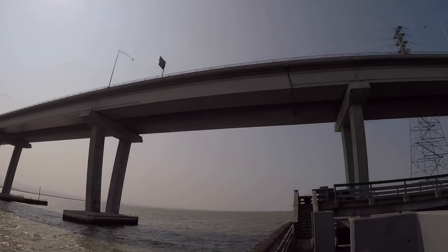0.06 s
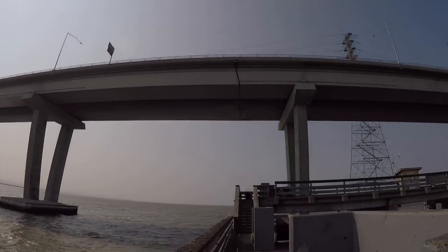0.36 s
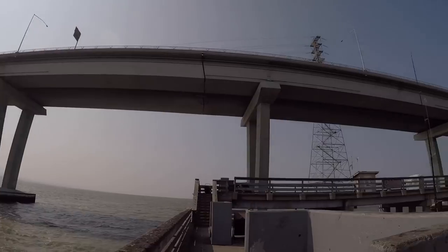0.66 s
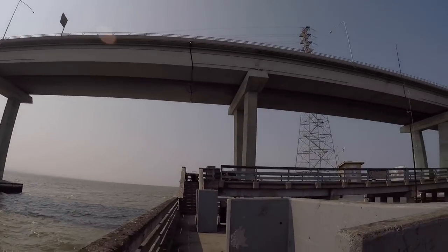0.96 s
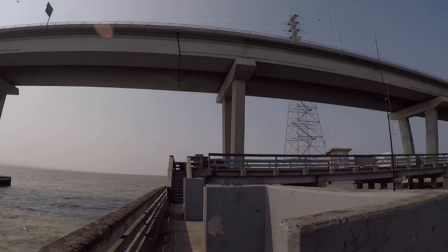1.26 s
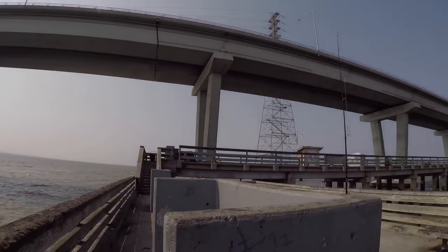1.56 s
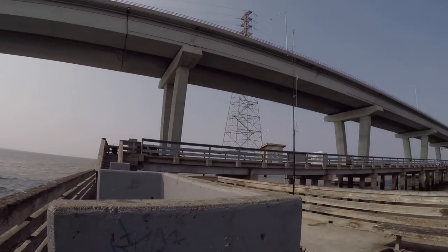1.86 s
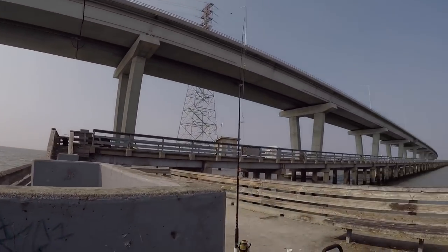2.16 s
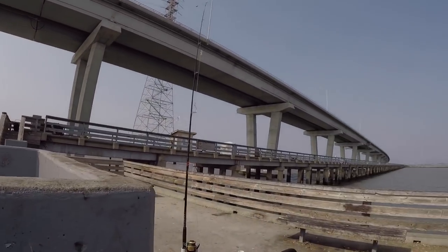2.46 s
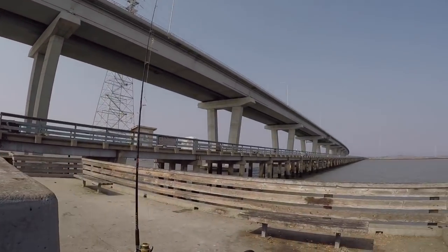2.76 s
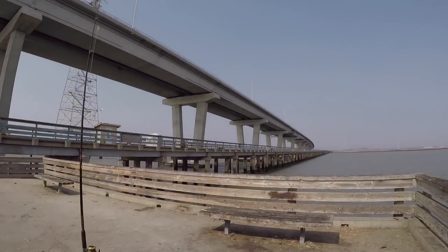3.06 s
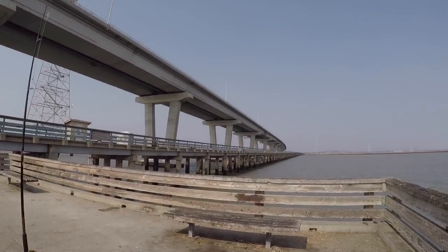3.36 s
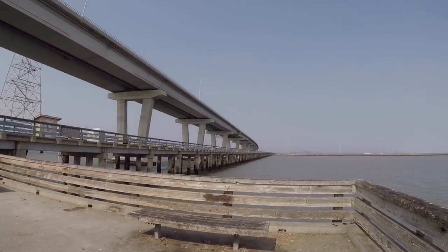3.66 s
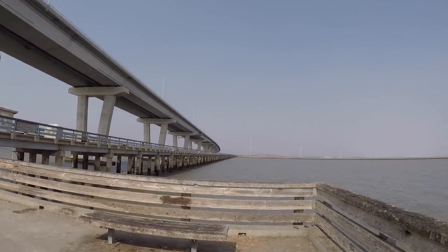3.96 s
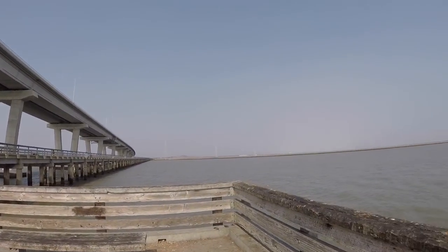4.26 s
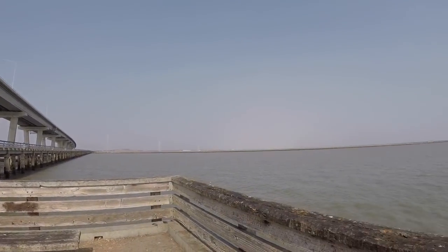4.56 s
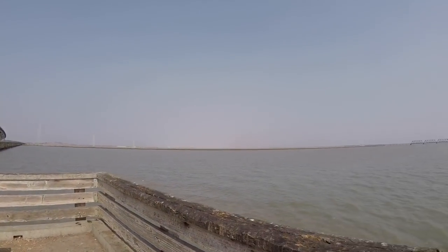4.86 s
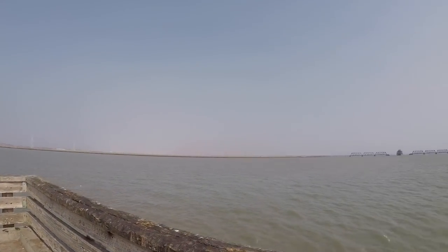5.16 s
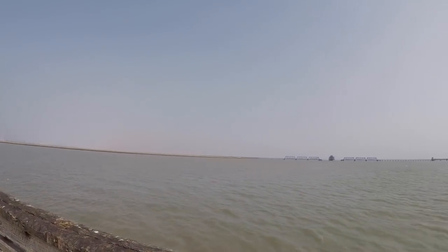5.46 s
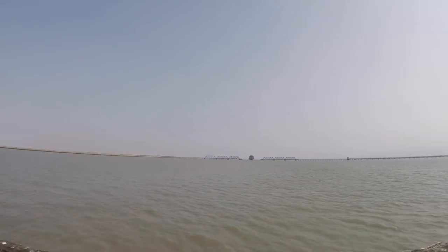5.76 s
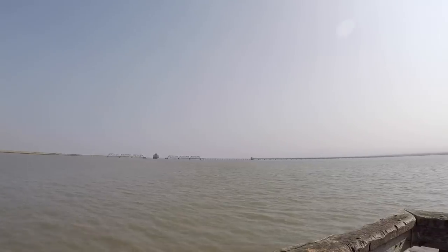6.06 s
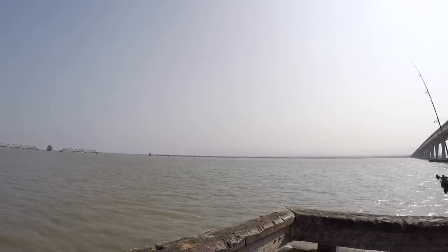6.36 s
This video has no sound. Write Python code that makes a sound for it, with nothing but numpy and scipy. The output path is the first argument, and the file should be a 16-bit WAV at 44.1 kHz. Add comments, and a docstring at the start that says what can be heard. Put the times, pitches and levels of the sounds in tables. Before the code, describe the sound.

Traffic rumbles on a bridge overhead while gusty wind buffets the microphone, with a sharp cluster of handling knocks midway.

```python
"""Tyres roar and a deck rumbles overhead, in gusts of wind, on a pier under a highway bridge.
Turbulence buffets the two ports of a small camera that is being swung round, and choppy water
hisses and splashes. Knocks on the mount set the camera's case ringing; the hardest make the
gain control duck everything and creep back over about two seconds."""
import sys
import numpy as np
from scipy import signal
from scipy.fft import rfft, irfft, next_fast_len
from scipy.io import wavfile
from scipy.ndimage import uniform_filter1d, minimum_filter1d

SR = 44100
rng = np.random.default_rng(int(sys.argv[2]) if len(sys.argv) > 2 else 0)


def bounce(signal):
    """Save signal as a 16-bit WAV file at the path given by the first command-line argument."""
    frames = np.transpose(np.atleast_2d(signal))
    limited = np.clip(frames, -1, 1)
    pcm = np.round(limited * 32767).astype(np.int16)
    wavfile.write(sys.argv[1], SR, pcm)


N = 291443
TIME = np.arange(N) / SR
SIZE = next_fast_len(N, real=True)
FREQS = np.maximum(np.fft.rfftfreq(SIZE, 1 / SR), 1)

# The camera swings clockwise. Each row: time in seconds, heading in degrees.
HEADING = [(0, 1), (1.5, 21), (3.0, 86), (3.8, 94), (4.5, 160), (5.5, 226), (6.6, 285)]
# Deck rumble below, tyre roar above. Each row: frequency in Hz, relative density in dB.
TRAFFIC_SPECTRUM = [(20, -20.5), (55, -6), (120, 0.5), (230, -9), (350, -17.5), (500, -16), (680, -19.5),
                    (950, -17.5), (1250, -20), (1720, -23.5), (2100, -29.5), (3500, -42), (4700, -50),
                    (9000, -70)]
# The roar at the two ports. Each row: frequency in Hz, coherence from 0 to 1, left lead in radians,
# left minus right in dB.
PORT_COHERENCE = [(100, 0.82, 0.49, 0), (516, 0.83, 0.11, -.5), (696, 0, -0.12, -1.5),
                  (920, 0.43, 1.66, -0.5), (1490, 0.83, 1.76, -.3), (2170, 0.7, 1.36, 1.8),
                  (3000, 0.24, 0.24, 2), (3900, 1, 1.2, 0), (6000, 0.1, -.5, 2)]
# Heavy vehicles. Each row: time overhead in seconds, relative peaks of roar, boom and tread hiss in dB.
VEHICLES = [(1.33, -34.5, -29.5, -54), (2.4, -34, -25.5, -49.5), (3.45, -35.5, -31.5, -49),
            (4.3, -49, -34.5, -69), (5.75, -35.5, -28, -66)]
# The nearest span. Each row: frequency in Hz, relative densities of boom, tread and side-on roar in dB.
SPAN_SPECTRA = [(70.4, -8.5, -48.5, -35.5), (130, 0.5, -43, -38.5), (233, -4.5, -33.5, -31),
                (315, -12.5, -21.5, -33.5), (500, -25, -27.5, -17.5), (1390, -46.5, 3, 1.5),
                (1770, -54, 12.5, 4.5), (1915, -54.5, -6, -1), (2120, -58.5, -15.5, -6),
                (2480, -58, 2, -13), (3220, -69, 5.5, -34), (4190, -79.5, -0.5, -21),
                (5000, -82.5, -18.5, -44.5), (9000, -86, -40, -53)]
# Wheels strike deck joints. Each row: start in seconds, pitch in Hz, level in dB, rise in seconds.
JOINTS = [(1.9655, 605, -20.5, .003), (2.131, 242, -18, .013), (5.337, 234, -14.5, .015)]
# One set of tyres sings. Each row: time in seconds, pitch in Hz, level in dB.
WHINE = [(2.7, 1028, -62), (3.1, 1000, -42), (3.4, 960, -42), (3.6, 920, -37), (3.76, 890, -41),
         (4.0, 850, -43), (4.3, 824, -66)]
STREAM_DB, STREAM_BOOM_DB, STREAM_TREAD_DB = -36, -34.5, -69.5  # steady cars, on the scale of VEHICLES
PASS_S, ON_SPAN_S = 0.38, 0.61  # overhead to half power; half the time a vehicle loads the span
BRIDGE_LEFT_DEG = 195  # heading that puts the roar furthest left
PAN_RIGHT_DB, PAN_SWING_DB = -3.5, 4  # left minus right at the opposite heading, and its swing
SIDE_ON_DEG, SIDE_ON_DB, SIDE_ON_FALL_DB = 130, -45, 14  # most nasal heading, level there, fall opposite

# Turbulence at the ports. Each row: frequency in Hz, relative densities at left and right in dB.
WIND_SPECTRA = [(10, -18, -31), (22.2, -9.5, -6), (40, 5, 0.5), (58.3, 1.5, 3), (113.6, -2, -7.5),
                (163.3, -8, -8), (239, -21.5, -19), (398, -28, -27), (736, -54, -50.5), (2500, -88, -95.5)]
# Gusts and lulls. Each row: centre and half length in seconds, change at left, right and in eddies in dB.
GUSTS = [(0.15, 0.18, 6, -1, 8), (0.48, 0.089, -1, -2, -7), (0.76, 0.15, 4, 1.3, 10),
         (1.3, 0.32, 10.5, -2.5, 5), (1.72, 0.093, -3, 2, 2.5), (2.33, 0.13, 4, 0.5, -6),
         (3.08, 0.52, 4, -2, -2.5), (3.7, 0.21, -2.5, 0.5, 7.5), (3.86, 0.06, -6, -7.5, 17.5),
         (4.09, 0.1, 1, 6.5, 10), (4.36, 0.12, 1.5, 5.5, 2), (4.68, 0.13, 3, 1, 4),
         (4.93, 0.15, -3, -1.5, -3), (5.38, 0.12, 1, 1.5, 7.5), (5.78, 0.079, 3.5, 1, 12),
         (6.19, 0.055, -4, -8, -6), (6.45, 0.18, -2, 0.7, 13.5)]
# Single eddies. Each row: centre in seconds, level in dB, half length in seconds, left minus right in dB.
BUFFETS = [(0.051, -11.5, 0.013, 10.5), (0.122, -11.5, 0.0053, 13.5), (0.294, -15, 0.0034, 17),
           (1.391, -15, 0.008, 12), (1.748, -13, 0.0051, -16), (3.509, -13, 0.004, -17),
           (3.706, -11, 0.006, -8), (4.143, -7, 0.011, -11.5), (4.685, -10.5, 0.014, -13),
           (5.495, -10.5, 0.007, -11.5), (5.834, -24, 0.019, -8), (6.02, -15.5, 0.017, -9.5),
           (6.11, -14.5, 0.01, -13.5), (6.267, -13, 0.0048, -13), (6.408, -12, 0.0063, -14.5),
           (6.51, -14, 0.0064, -13)]
BREEZE_LEFT_DB, BREEZE_RIGHT_DB, BREEZE_EDDY_DB = -22, -14.5, -3  # the left port is sheltered
WINDWARD_DEG, WINDWARD_DB = 197, 3.5  # heading that faces the wind, and the rise there

# Knocks on the case. Each row: start in seconds, initial thump pitch in Hz, thump, tick and ring in dB.
KNOCKS = [(3.768, 390, 10, -44, -35), (3.8025, 536, 2.5, -34, -15.5), (4.0486, 495, 8.5, -15, -17),
          (4.0672, 614, -8, -28, -11.5), (4.075, 560, -4, -12.5, -12), (4.0784, 563, 23.5, -15, -4.5),
          (4.116, 162, 20, -54, -14), (4.156, 560, -1, -46, -21), (6.0823, 438, 3, -42, -23)]
# Modes of the case. Each row: frequency in Hz, gain in dB, T60 in seconds, left-to-right motion ratio.
CASE_MODES = [(353, 5.5, 0.059, -0.13), (441, 6.5, 0.055, -0.41), (547, 2.5, 0.22, -0.74),
              (695, -10, .025, -0.23), (850, -4.5, 0.026, -0.36), (1140, -3.5, 0.0089, 0.8),
              (1440, -3.5, .016, -0.013), (1755, -6.5, 0.013, -0.13)]
# Plastic ticks on plastic. Each row: frequency in Hz, relative density in dB.
TICK_SPECTRUM = [(300, 18), (1300, 13.5), (2200, 3), (3100, 0), (4300, -9), (6000, -5.5), (7700, -1),
                 (9000, -22), (10500, -22), (13000, -68)]
# The grip slips. Each row: start in seconds, ring in dB, rise and decay in seconds, rasp in dB.
RUBS = [(3.66, -28, 0.025, 0.084, -45), (3.86, -28, 0.074, 0.05, -37), (4.015, -23, 0.034, 0.028, -40),
        (4.21, -19.5, 0.029, 0.078, -28), (4.315, -22, 0.028, 0.023, -29.5),
        (6.072, -22, 0.015, 0.022, -25), (6.112, -33, 0.0043, 0.0087, -30),
        (6.258, -22, 0.0095, 0.027, -38), (6.37, -33, 0.018, 0.36, -52)]
# The dry rasp of the grip. Each row: frequency in Hz, relative density in dB.
RASP_SPECTRUM = [(300, -5), (560, 2), (1000, -4), (1700, -4), (2400, -21.5), (5000, -38), (12000, -60)]
# A finger brushes the case. Each row: start in seconds, level in dB, rise and decay in seconds.
SCUFFS = [(4.335, -53, .015, .025), (5.875, -51, .01, .018), (5.928, -46, 0.012, 0.017),
          (6.437, -56, .008, 0.013), (6.464, -53, 0.0075, .014)]
# The finger's hiss. Each row: frequency in Hz, relative density in dB.
SCUFF_SPECTRUM = [(2000, -9), (4200, -15), (5000, 2), (6200, 0), (7400, -3), (8500, -11), (13000, -32)]

# Hiss of the chop. Each row: frequency in Hz, relative density in dB.
WATER_SPECTRUM = [(1500, -15.5), (3000, -6.5), (4700, -2), (6200, 2), (7500, -2), (9000, -8), (11000, -13),
                  (13000, -31), (15000, -49)]
# Larger waves wash by. Each row: centre and half length in seconds, rise of the hiss in dB.
WAVES = [(1.35, 0.46, 3), (2.45, .12, 3), (3.2, 0.54, 1), (4.25, 0.1, 2.5), (5.8, 0.4, 1.5)]
# Small splashes. Each row: start in seconds, level in dB, rise and decay in seconds.
SPLASHES = [(2.859, -19.5, 0.001, 0.0021), (2.865, -34.5, .003, 0.018), (3.183, -35, 0.0036, 0.011),
            (4.87, -38, .002, .008)]
# Their spray. Each row: frequency in Hz, relative density in dB.
SPLASH_SPECTRUM = [(500, -3), (900, 16), (1600, 14.5), (2300, 9), (3100, 4.5), (4300, -2), (5500, -1),
                   (6200, 5.5), (7200, -9), (8400, -1), (9500, -21), (14000, -30)]
WATER_DB = -54.5  # hiss between waves
CEILING, TOP_HZ = .95, 14100  # amplitude where ducking begins; low-pass edge


def traffic(level_db, pan_db, gain_db=9.5, patchy_db=0.5, bands=6):
    """Incoherent sources sum to one roar, partly coherent between the ports; its bands swell separately."""
    coherence, lead, shade_db = spectra(PORT_COHERENCE)
    coherence = np.clip(coherence, 0, 1)
    left = white()
    right = coherence * np.exp(-1j * lead) * left + np.sqrt(1 - coherence ** 2) * white()
    ports = np.array([left, right]) * pan(shade_db) * undb(spectra(TRAFFIC_SPECTRUM)[0])
    position = np.log2(FREQS / 10) / 2  # bands lie two octaves apart
    roar = 0
    for k in range(bands):
        band = sound(ports * np.maximum(1 - abs(position - k), 0))
        roar = roar + band * undb(patchy_db * walk(16.0))
    return unit(roar) * undb(level_db + gain_db) * pan(pan_db)


def passing():
    """Roar, boom and tread in dB: tyres obey the inverse square law; the deck booms while loaded."""
    s, roar_db, boom_db, tread_db = np.transpose(VEHICLES)
    age = TIME - s[:, None]
    nearness = 1 / (1 + (age / PASS_S) ** 2)
    load = np.exp(-(age / ON_SPAN_S) ** 2)
    layers = [(STREAM_DB, roar_db, nearness), (STREAM_BOOM_DB, boom_db, load),
              (STREAM_TREAD_DB, tread_db, nearness)]
    return [10 * np.log10(undb(stream_db) ** 2 + undb(peak_db) ** 2 @ share)
            for stream_db, peak_db, share in layers]


def near_span(boom_db, tread_db, throb_db=2.0):
    """Forced vibration: heavy wheels make the deck boom, hiss with their treads and clunk over joints."""
    boom, tread, side_on = (noise(colour) for colour in spectra(SPAN_SPECTRA))
    deck = boom * undb(boom_db + throb_db * walk(3.6)) + tread * undb(tread_db)
    for s, hz, db, rise in JOINTS:
        age = np.maximum(TIME - s, 0)
        deck += undb(db) * age / rise * np.exp(1 - age / rise) * np.sin(2 * np.pi * hz * age)
    # with the bridge off to the left, the case lends the roar a nasal band
    side_db = SIDE_ON_DB - SIDE_ON_FALL_DB * (1 - facing(SIDE_ON_DEG))
    return deck * pan(-1.2) + side_on * undb(side_db) * pan(18.4)


def tyre_whine(width_hz=78):
    """Periodic forcing of tread by grooved concrete gives a rough tone that sinks as the vehicle passes."""
    hz, db = curves(WHINE)
    phase = 2 * np.pi * np.cumsum(hz) / SR
    narrowband = walk(width_hz) * np.cos(phase) + walk(width_hz) * np.sin(phase)
    return unit(narrowband) * undb(db) * pan(0.96)


def wind(flutter_db=0.98, eddy_db=2.5, eddy_hz=210, opposed=0.24):
    """Turbulence: slow pressure swings, partly in antiphase at the ports, with bursts of small eddies."""
    *port_db, strength_db = airflow()
    highpass = 1 / (1 + (eddy_hz / FREQS) ** 4)
    across = white()
    ports = []
    for sign, db, colour in zip((1, -1), port_db, spectra(WIND_SPECTRA)):
        pressure = (sign * np.sqrt(opposed) * across + np.sqrt(1 - opposed) * white()) * undb(colour)
        eddies = sound(pressure * highpass) * undb(strength_db + eddy_db * walk(32))
        flow = sound(pressure * (1 - highpass)) + eddies
        ports.append(unit(flow * undb(flutter_db * walk(3.5))) * undb(db))
    return np.array(ports)


def airflow():
    """Wind noise grows with exposure and gusts: left level, right level and eddy strength in dB."""
    left_db, right_db, eddy_db = swells(GUSTS)
    exposure_db = WINDWARD_DB * facing(WINDWARD_DEG)
    return (BREEZE_LEFT_DB + exposure_db + left_db, BREEZE_RIGHT_DB + exposure_db + right_db,
            BREEZE_EDDY_DB + eddy_db)


def buffets(flap_hz=165, wander_octaves=.35):
    """The pressure pulse of a large eddy is a dull flap of unsteady pitch, in antiphase at the ports."""
    force = sum(undb(db) * np.exp(-.5 * ((TIME - s) / length) ** 2) * pan(side_db)
                for s, db, length, side_db in BUFFETS)
    hz = flap_hz * 2 ** (wander_octaves * walk(118))
    return force * np.sin(2 * np.pi * np.cumsum(hz) / SR) * np.array([[1], [-1]])


def handling(tick_rise_s=0.00023, tick_s=0.004, slip_db=1.5, left_thump=0.16):
    """Impact ticks, heaves and rings the case; friction of a slipping grip rasps and keeps it ringing."""
    thump, tick, taps = np.zeros((3, N))
    for s, hz, thump_db, tick_db, ring_db in KNOCKS:
        span = slice(int(s * SR), int(s * SR) + SR // 4)
        age = TIME[:len(TIME[span])]
        thump[span] += undb(thump_db) * heave(age, hz)
        tick[span] += undb(tick_db) * np.minimum(age / tick_rise_s, 1) * np.exp(-age / tick_s)
        taps[span.start] += undb(ring_db)
    grip = undb(slip_db * walk(150))
    friction = rng.standard_normal(N) * grip
    ring = case_ring(taps) + bursts([row[:-1] for row in RUBS]) * unit(case_ring(friction))
    ticks = tick * stereo_noise(TICK_SPECTRUM) * pan(2.8)
    slipping = bursts([(s, rasp_db, rise, decay) for s, _, rise, decay, rasp_db in RUBS])
    rasp = slipping * grip * stereo_noise(RASP_SPECTRUM)
    # a shaken case pushes its two ports in opposite directions
    return np.array([-left_thump * thump, thump]) + ring + ticks + rasp


def heave(age, hz, soften_cycles=1.27, peak_cycles=0.96, width_cycles=0.51,
          sway_hz=60, sway_db=-8, sway_s=.011):
    """A softening contact lowers the frequency: the case lurches once, then sways on its mount."""
    cycles = soften_cycles * np.log1p(hz * age / soften_cycles)
    lurch = np.exp(-((cycles - peak_cycles) / width_cycles) ** 2) * np.sin(2 * np.pi * cycles)
    sway = (age / sway_s * np.exp(1 - age / sway_s)) ** 2 * np.sin(2 * np.pi * sway_hz * age)
    return lurch + undb(sway_db) * sway


def case_ring(force):
    """Modal response: a force is convolved with the case's damped modes, low-passed by the soft mount."""
    age = TIME[:SR // 2]
    modes = 0
    for k, (hz, db, t60, left) in enumerate(CASE_MODES):
        mode = np.sin(2 * np.pi * hz * age) * np.exp(-np.log(1000) * age / t60)
        modes = modes + (-1) ** k * undb(db) * np.array([[left], [1]]) * mode
    response = signal.sosfilt(signal.butter(2, 2200, fs=SR, output="sos"), modes)
    return signal.fftconvolve(force[None], response, axes=1)[:, :N]


def scuffs(grain_db=1.0):
    """Sliding friction of a finger on the case makes a thin, grainy hiss."""
    return bursts(SCUFFS) * stereo_noise(SCUFF_SPECTRUM) * undb(grain_db * walk(200)) * pan(-4)


def water(level_db, fizz_db=1.0, lap_db=0.9):
    """Independent wavelets all round give uncorrelated fizz at the two ports; a few splash close by."""
    colour_db = spectra(WATER_SPECTRUM)[0]
    fizz = np.array([unit(noise(colour_db) * undb(fizz_db * walk(250))) for _ in range(2)])
    spray = stereo_noise(SPLASH_SPECTRUM) * undb(4.2 * walk(300))
    hiss = fizz * undb(level_db + lap_db * walk(13.0))
    return hiss * pan(-1.5) + bursts(SPLASHES) * spray * pan(-2.3)


def bursts(table):
    """Summed envelopes with linear rise and exponential decay."""
    envelope = 0
    for s, db, rise, decay in table:
        age = np.maximum(TIME - s, 0)
        envelope += undb(db) * np.minimum(age / rise, 1) * np.exp(-np.maximum(age - rise, 0) / decay)
    return envelope


def swells(table):
    """Summed Gaussian swells in dB, one curve for each level column."""
    s, length, *columns = np.transpose(table)
    return np.array(columns) @ np.exp(-((TIME - s[:, None]) / length[:, None]) ** 2)


def facing(degrees):
    """A cardioid: 1 while the camera points at this heading, 0 while it points the opposite way."""
    return (1 + np.cos(np.radians(curves(HEADING)[0] - degrees))) / 2


def pan(db):
    """Left and right gains for a level difference, left minus right."""
    return undb(np.array([db, -db]).reshape(2, -1) / 2)


def curves(table):
    """The columns of a time table, interpolated to each sample."""
    s, *columns = np.transpose(table)
    return [np.interp(TIME, s, c) for c in columns]


def spectra(table):
    """The columns of a frequency table, interpolated to each bin in log frequency."""
    hz, *columns = np.transpose(table)
    return [np.interp(np.log(FREQS), np.log(hz), c) for c in columns]


def walk(rate_hz, size=16384):
    """Random modulation of rms 1: noise low-passed at the given rate."""
    hz = np.fft.rfftfreq(size, TIME[-1] / size)
    steps = irfft(rfft(rng.standard_normal(size)) / (1 + (hz / rate_hz) ** 4))
    return np.interp(TIME, np.linspace(0, TIME[-1], size), unit(steps))


def stereo_noise(table):
    """Two uncorrelated noises with the same spectrum."""
    return np.array([noise(spectra(table)[0]) for _ in range(2)])


def noise(colour_db):
    """Spectrally shaped noise of rms 1."""
    return unit(sound(white() * undb(colour_db)))


def white():
    """The complex Gaussian spectrum of fresh white noise."""
    return rng.standard_normal(2 * len(FREQS)).view(complex)


def sound(spectrum):
    """Inverse Fourier transform from spectrum to waveform."""
    return irfft(spectrum, SIZE)[..., :N]


def unit(x):
    """Scale to rms 1."""
    return x / np.sqrt(np.mean(x ** 2))


def undb(db):
    """Amplitude ratio for a level in dB."""
    return 10 ** (np.asarray(db) / 20)


def scene():
    """Superposition of bridge, water, wind and handling at the ports of the turning camera."""
    roar_db, boom_db, tread_db = passing()
    pan_db = PAN_RIGHT_DB + PAN_SWING_DB * facing(BRIDGE_LEFT_DEG) ** 2
    bridge = traffic(roar_db, pan_db) + near_span(boom_db, tread_db) + tyre_whine()
    chop = water(WATER_DB + swells(WAVES)[0])
    return bridge + chop + wind() + buffets() + handling() + scuffs()


def release(over_db, db_per_s):
    """Peak detection: each peak is caught and sinks at a steady rate."""
    ramp = db_per_s * TIME
    return np.maximum.accumulate(over_db + ramp) - ramp


def record(dry, fast_db_per_s=120, slow_db_per_s=7.0, held_share=0.59):
    """Automatic gain control: peaks over the ceiling duck the sound; most of the cut lifts slowly."""
    over_db = 20 * np.log10(np.maximum(abs(dry).max(axis=0) / CEILING, 1))
    cut_db = np.maximum(release(over_db, fast_db_per_s), release(held_share * over_db, slow_db_per_s))
    gain = uniform_filter1d(minimum_filter1d(undb(-cut_db), size=60), size=60)
    lowpass = signal.ellip(8, .2, 70, TOP_HZ, fs=SR, output="sos")
    return signal.sosfilt(lowpass, dry * gain)


dry = scene()
out = record(dry)
bounce(out)
```